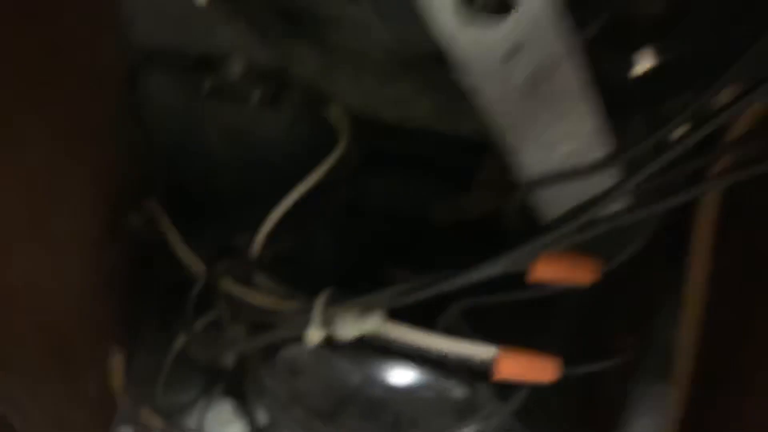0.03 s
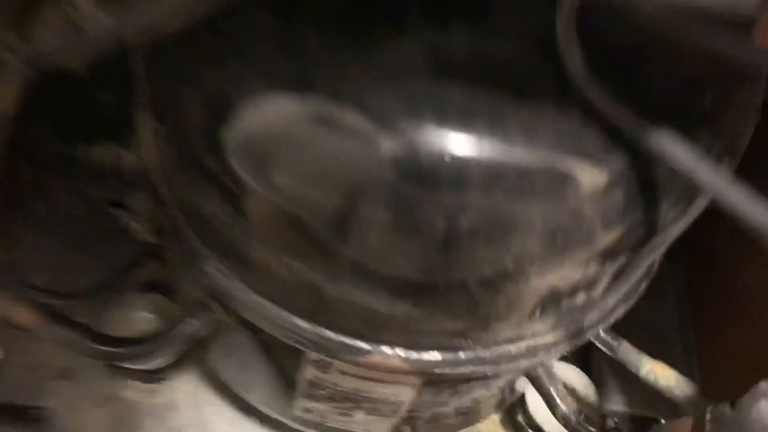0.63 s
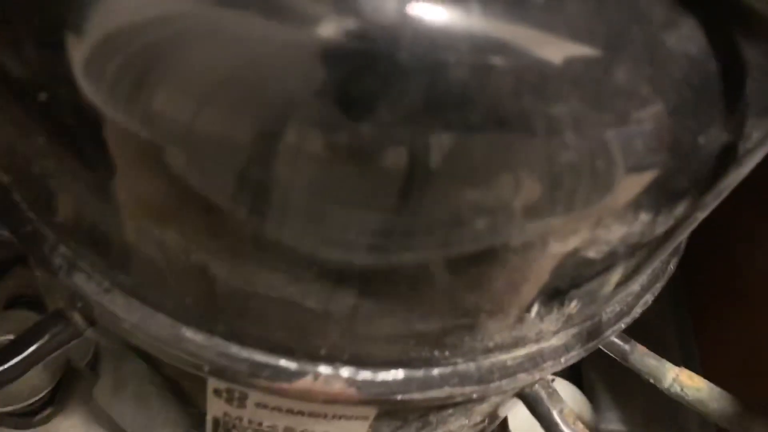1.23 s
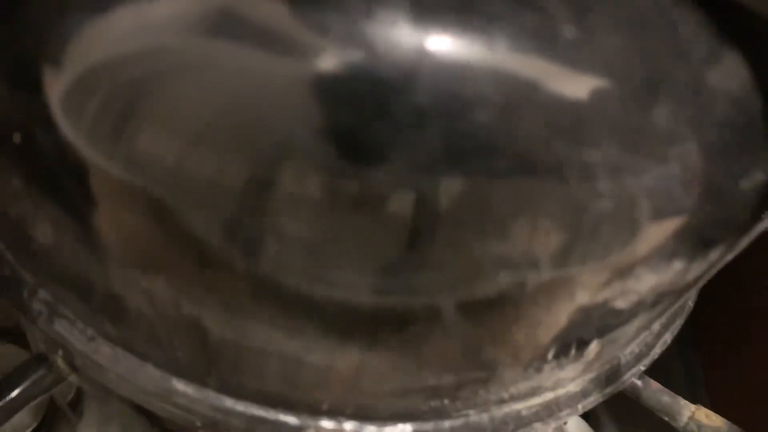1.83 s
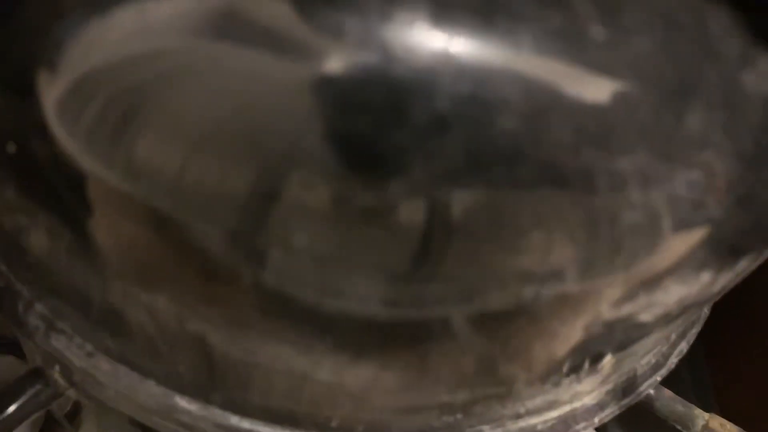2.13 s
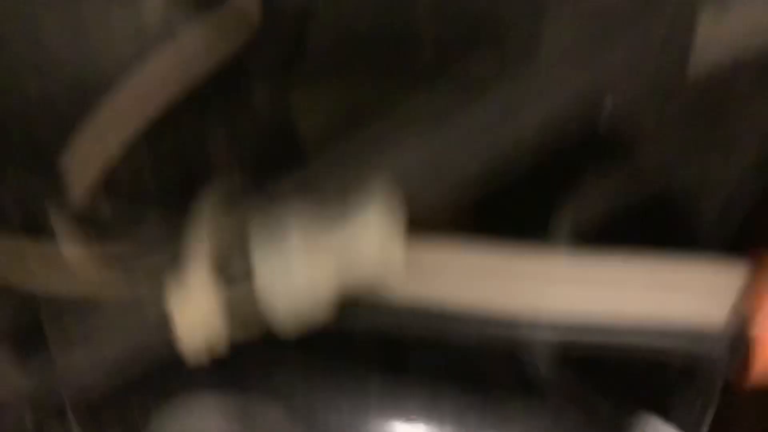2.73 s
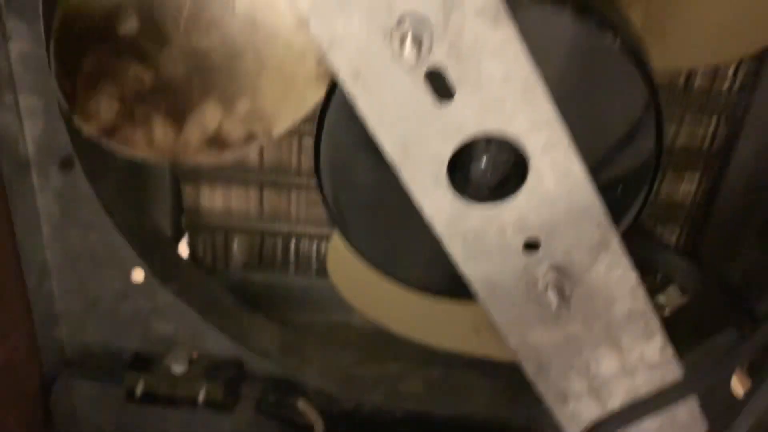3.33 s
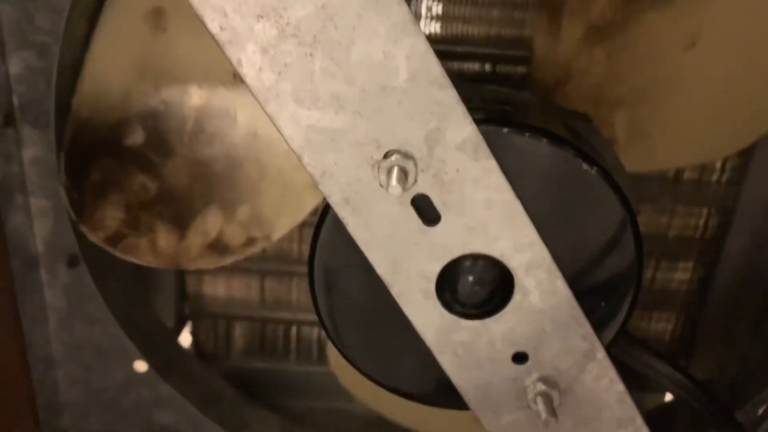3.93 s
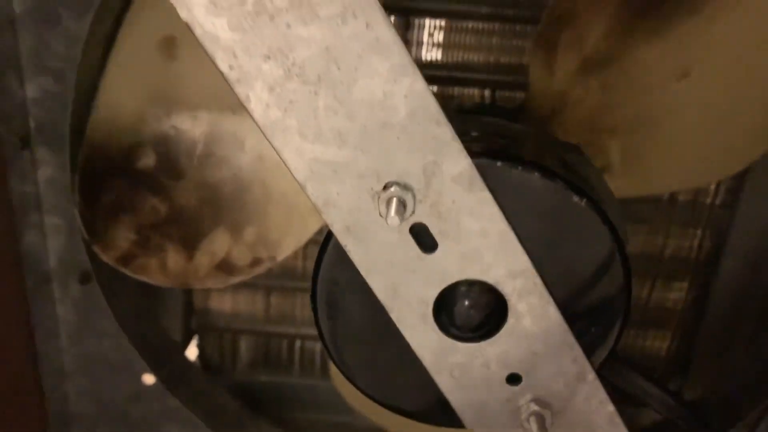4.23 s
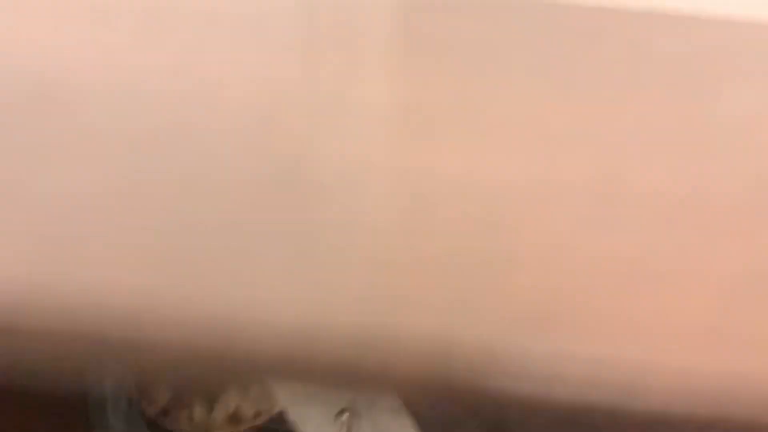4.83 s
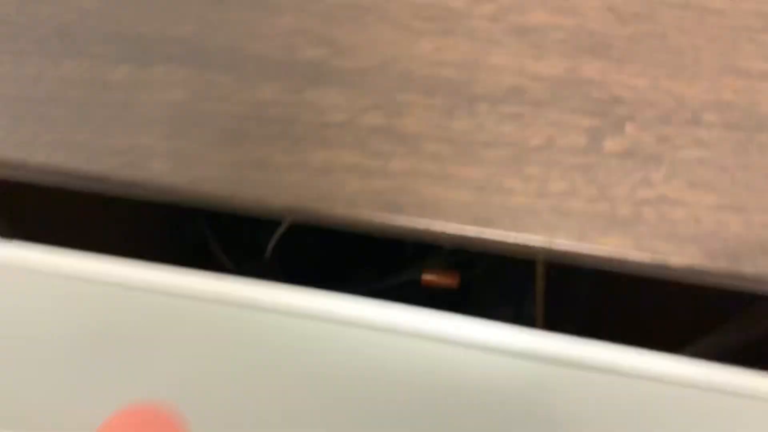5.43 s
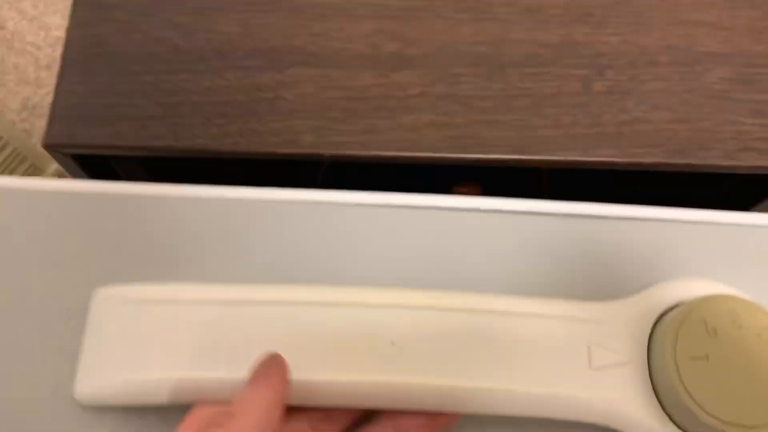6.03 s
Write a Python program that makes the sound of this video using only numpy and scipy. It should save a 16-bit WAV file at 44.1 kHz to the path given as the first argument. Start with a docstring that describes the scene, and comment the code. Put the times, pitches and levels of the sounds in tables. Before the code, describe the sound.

A refrigerator runs throughout, its fan giving a low drone and a steady rush of air with a fine hiss. In the first second the microphone moves close to the compressor, whose low hum carries a light metallic buzz, with a thin whine swelling around 2 seconds. The steel shell flares in brief, faint sizzles, mostly between 2 and 4 seconds. From about 3 seconds the microphone faces the fan and the air rush leads. The draught buffets the microphone with low rumbles and soft thumps near 1, 2.5 and 4.6 seconds. Around 5 seconds the microphone backs out into the small room and the machinery becomes quieter and duller. At about 5.7 seconds the plastic door handle snaps with a sharp click, followed by a quick hollow clack and dull knocks, the door ringing briefly over the hum until the end at 6 seconds.

```python
"""A refrigerator's condenser fan drones and pushes air through the coil; beside it a sealed compressor
hums and its piston rings the steel shell. The microphone moves in from the bay's rim to the compressor,
on to the fan, through its draught, then backs out of the cabinet. A hand pulls the plastic door handle,
which clicks and knocks in the small room.
Places: 0 beside the compressor, 1 facing the fan, 2 at the rim of the bay, 3 out in the room."""
import sys
import numpy as np
from scipy import signal
from scipy.fft import rfft, irfft, next_fast_len
from scipy.io import wavfile
from scipy.ndimage import uniform_filter1d, map_coordinates

SR = 44100
rng = np.random.default_rng(int(sys.argv[2]) if len(sys.argv) > 2 else 0)


def materialize(psi):
    """Save the field psi as 16-bit PCM at rate SR to the path in sys.argv[1].

    A 1-D psi becomes a single channel; in a 2-D psi each row is a channel.
    """
    bounded = np.clip(np.atleast_2d(psi).T, -1, 1)
    quanta = np.round(bounded * 32767).astype(np.int16)
    wavfile.write(sys.argv[1], SR, quanta)


N = 268304


def amp(db):
    """Decibels to gain."""
    return 10 ** (np.asarray(db) / 20)


def unit(x):
    """Scale to rms 1."""
    return x / np.sqrt(np.mean(x ** 2) + 1e-20)


def along(points, hz):
    """(Hz, value) points read on a log axis."""
    f, v = np.transpose(points)
    return np.interp(np.log(hz + 1), np.log(f + 1), v)


def curve(points):
    """(s, value) points read at every sample."""
    return np.interp(np.arange(N) / SR, *np.transpose(points))


def at_place(values, place):
    """Glide between values for places 0 to 3."""
    return np.interp(place, np.arange(len(values)), values)


def swells(rows):
    """Bell-shaped level changes in dB from (s, length s, dB) rows."""
    t = np.arange(N) / SR
    return sum(db * np.exp(-(2 * (t - s) / length) ** 2) for s, length, db in rows)


def wobble(knots_per_s):
    """Smooth random curve."""
    knots = rng.standard_normal(int(N * knots_per_s / SR) + 4)
    return map_coordinates(knots, [np.arange(N) * knots_per_s / SR])


def fading(start_s, t60_s, attack_s=0.00062):
    """Quick rise at start_s, then exponential decay."""
    age = np.maximum(np.arange(N) / SR - start_s, 0)
    return (1 - np.exp(-age / attack_s)) * amp(-60 * age / t60_s)


def filtered(x, response):
    """Apply a complex response of frequency."""
    m = next_fast_len(N + SR // 2)
    return irfft(rfft(x, m) * response(np.fft.rfftfreq(m, 1 / SR)), m)[..., :N]


def spread(pair):
    """Mix two unrelated signals to left and right: alike in the low mids, wide in the upper mids,
    fully alike in the top treble."""
    # (frequency [Hz], left-right correlation [ratio])
    likeness = [(40, 0.047), (150, 0.33), (350, 0.92), (750, 0.54), (1150, 0.3), (1500, 0.18), (2000, 0),
                (6500, 0), (7800, 0.79), (9000, 1), (15000, 1)]
    turn = lambda hz: np.arccos(np.clip(along(likeness, hz), -1, 1)) / 2
    mid, side = filtered(pair, lambda hz: np.array([np.cos(turn(hz)), np.sin(turn(hz))]))
    return np.array([mid + side, mid - side])


def noise(spectrum, patchy_db=0.0, modes=()):
    """Stereo noise of rms 1, lifted at its resonances, with drifting patches of gain."""
    z = signal.stft(rng.standard_normal((2, N)), nperseg=1024)[2]
    patches = uniform_filter1d(rng.standard_normal(z.shape[1:]), size=4, axis=0)
    patches = unit(uniform_filter1d(patches, size=6, axis=1))
    pair = signal.istft(z * amp(patchy_db * patches), nperseg=1024)[1][:, :N]
    boost_db = lambda hz: sum(db / (1 + (2 * (hz - centre) / width) ** 2) for centre, width, db in modes)
    return unit(spread(filtered(pair, lambda hz: amp(along(spectrum, hz) + boost_db(hz)))))


def fan_tones(blade_rad, place, jitter_rad=0.054, apart_rad=0.43):
    """Each passing blade pushes the air; uneven inflow shakes the size and timing of the pushes."""
    # (blade-rate order, level at places 0 to 3 [dB])
    harmonics = [(1, -33.5, -30, -25.5, -40.5), (2, -28, -30, -40.5, -41), (3, -35, -40.5, -33, -62),
                 (4, -34.5, -36.5, -37.5, -49.5), (5, -52, -44.5, -43, -49.5), (6, -43, -45.5, -47, -63),
                 (7, -60, -49, -53.5, -50), (8, -58, -56, -53, -74)]
    # one tone swells or sinks: (time [s], length [s], order, change [dB])
    tone_swells = [(0.136, 0.075, 1, 6), (0.217, 0.2, 2, 7), (.58, 0.068, 4, 6), (0.71, 0.29, 3, -21),
                   (0.73, 0.099, 4, -5), (1.145, 0.23, 2, -11), (1.72, .16, 1, -14), (2.715, 0.083, 4, 7.5),
                   (3.0, 0.34, 1, -11), (3.8, .12, 1, -16), (3.84, 0.25, 3, 12.5), (3.842, 0.12, 2, -8),
                   (3.99, 0.19, 1, 5.5), (4.55, 0.26, 5, 8.5), (4.597, 0.21, 4, 5), (4.62, 0.34, 1, 3),
                   (4.864, .14, 1, 5), (5.02, 0.064, 1, 4), (5.245, 0.2, 1, 4.5), (5.48, 0.14, 1, -14),
                   (5.3, 0.47, 5, -24)]
    # (flutter depth at places 0 to 3 [dB])
    flutter_db = [2.2, 2.2, 1.2, 1.2]
    out = np.zeros((2, N))
    for order, *levels_db in harmonics:
        db = at_place(levels_db, place) + at_place(flutter_db, place) * wobble(16)
        db += swells([(s, length, change) for s, length, k, change in tone_swells if k == order])
        phase = order * (blade_rad + jitter_rad * wobble(14)) + rng.uniform(0, 2 * np.pi)
        port_rad = apart_rad * np.array([wobble(3.03), wobble(2.974)])
        out += np.sqrt(2) * amp(db) * np.sin(phase + port_rad)
    return out


def air_rush(blade_rad, place, doublings, db_per_doubling=-6.5, chop=0.029, slide=0.08):
    """Fan turbulence, chopped at the blade rate and coloured by each place's standing waves."""
    # air behind the fan, in front, in the room: (frequency [Hz], relative density [dB])
    behind_spectrum = [(60, -4), (150, 2.5), (260, 0.5), (360, -4.5), (450, -18), (520, -7), (640, -7),
                       (1050, -18.5), (1400, -16.5), (2200, -20.5), (4000, -25.5), (5500, -32),
                       (8000, -37.5), (16000, -51)]
    front_spectrum = [(60, -9.5), (150, 1.5), (260, -4.5), (400, -8), (620, -8), (750, -11.5),
                      (1200, -14.5), (2200, -19.5), (3000, -23), (4100, -25.5), (5500, -32), (8000, -36.5),
                      (16000, -71)]
    room_spectrum = [(50, -11), (105, 2), (160, 0), (262, 3), (350, -1.5), (450, -0.5), (900, -5.5),
                     (1600, -10), (3000, -18.5), (5500, -25.5), (16000, -50)]
    # standing waves: (frequency [Hz], width [Hz], boost [dB])
    bay_modes = [(900, 90, 3), (1213, 110, 6.5), (1580, 140, 4), (2035, 100, 5), (2540, 270, 1.5),
                 (3300, 84, 2.5)]
    fan_modes = [(1335, 31, 7.4), (1520, 150, 3.2), (1910, 120, 2.8)]
    room_modes = [(1300, 80, 2.3), (1620, 56, 1.4)]
    behind = noise(behind_spectrum, patchy_db=1.2, modes=bay_modes)
    pitch_ratio = 1 + slide * np.minimum(place, 1)  # the bay's noise rises towards the fan
    behind = np.array([map_coordinates(x, [np.cumsum(pitch_ratio)], mode="mirror") for x in behind])
    front = noise(front_spectrum, patchy_db=2.04, modes=fan_modes)
    outside = noise(room_spectrum, patchy_db=2.6, modes=room_modes)
    # (noise, level at zero doublings [dB], power share at places 0 to 3)
    fields = [(behind, -28, [1, 0, 0, 0]), (front, -30.5, [0, 1, .5, 0]), (outside, -30.5, [0, 0, .5, 1])]
    rush = sum(np.sqrt(at_place(shares, place)) * amp(db) * air for air, db, shares in fields)
    return rush * amp(db_per_doubling * doublings) * (1 + chop * np.sin(blade_rad))


def coil_hiss(place, treble_loss_db):
    """Air hisses through the coil; its fins whistle, best heard facing the fan."""
    # (frequency [Hz], relative density [dB])
    spectrum = [(2000, -19), (5000, -9.5), (7300, -6), (7900, 2), (8800, -2.5), (9900, 1.5), (11400, -4),
                (12300, -5.5), (13200, -5.5), (14100, -6), (15700, -12)]
    # fin whistles: (frequency [Hz], width [Hz], boost [dB])
    fin_modes = [(10370, 110, 10.5), (11020, 190, 7.5)]
    facing = at_place([0, 1, 0, 0], place) ** 2
    plain = np.sqrt(1 - facing) * noise(spectrum, patchy_db=3)
    whistling = np.sqrt(facing) * noise(spectrum, patchy_db=3, modes=fin_modes)
    return amp(at_place([-45, -44.5, -47, -41.5], place) - treble_loss_db) * (plain + whistling)


def motor_hum(turns, place, waver_db=2.2):
    """The compressor motor hums on its shaft orders."""
    # (shaft order, level at places 0 to 3 [dB])
    harmonics = [(1, -55, -53, -49, -42), (2, -35, -48, -48, -40), (4, -41.5, -45.5, -36, -53),
                 (5, -50, -54, -48, -52)]
    hum = np.zeros(N)
    for order, *levels_db in harmonics:
        phase = 2 * np.pi * (order * turns + rng.random())
        hum += np.sqrt(2) * amp(at_place(levels_db, place)) * np.sin(phase)
    return hum * amp(waver_db * wobble(4.12))


def piston_strokes(turns, shaft_hz, gas_gain=0.58, stroke_db=1.0):
    """Each stroke puffs gas through the valve, whose repeating rattle gives lines at the shaft rate."""
    one_turn = unit(irfft(np.exp(2j * np.pi * rng.random((2, round(SR / shaft_hz / 2))))))
    rattle = np.array([map_coordinates(r, [turns % 1 * len(r)], mode="grid-wrap") for r in one_turn])
    gas = gas_gain * rng.standard_normal((2, N))
    return spread((rattle + gas) * amp(stroke_db * np.cos(2 * np.pi * turns)))


def compressor_shell(strokes, place, treble_loss_db, rasp_db=1.6, rasp_per_s=45):
    """Piston strokes ring the steel shell in five groups of modes; some flare and sputter."""
    # shell modes: (frequency [Hz], width [Hz], relative level [dB])
    low_modes = [(655, 380, 1), (910, 130, -7), (1194, 75, -2.5), (1540, 100, -6), (1990, 160, -13),
                 (2590, 170, -15)]
    whine_modes = [(1599, 60, 0)]
    main_modes = [(4053, 75, 0)]
    high_modes = [(4980, 70, -4), (7860, 230, 0)]
    sizzle_modes = [(4930, 65, 0), (6750, 100, 3), (7950, 95, -5.5), (10860, 300, 0.5), (12080, 390, 0.5)]
    # (level between flares at places 0 to 3 [dB])
    low_base_db = [-46.5, -69, -70, -75]
    main_base_db = [-60, -60, -59, -76]
    # (time [s], length [s], low change [dB], main change [dB], high change [dB])
    flares = [(.42, .1, -2, 4, 0), (.61, .1, -4, 9, 2), (.91, 0.26, 7, 10.5, -6), (1.28, .12, 3, 6, -2),
              (1.88, .14, -3, 2, 13), (2.35, 0.33, 6, 3, 11), (2.69, .09, 5, 6, 15),
              (2.782, 0.13, 0, 14.5, 11), (2.962, 0.11, -6, 11, 11), (3.15, .07, 0, 0, 14),
              (3.262, 0.12, -3, -4, 14), (3.567, .16, -2, 11, 9), (3.85, .1, -6, 7, 17),
              (4.3, 0.28, -2, 5, 5), (4.782, .12, 0, -2, 11)]
    # (time [s], level [dB])
    whine_db = [(0, -68), (1.2, -57), (1.7, -54), (2.1, -44), (2.5, -49), (2.8, -58), (6.08, -75)]
    low_db, main_db, high_db = (swells(np.array(flares)[:, [0, 1, column]]) for column in (2, 3, 4))
    low_db += at_place(low_base_db, place)
    main_db += at_place(main_base_db, place) + rasp_db * wobble(rasp_per_s)
    high_db += -63.5 - treble_loss_db + rasp_db * wobble(rasp_per_s)
    groups = [(low_modes, low_db), (whine_modes, curve(whine_db)), (main_modes, main_db),
              (high_modes, high_db), (sizzle_modes, -57 - treble_loss_db)]
    bandpass = lambda hz, centre, width: 1j * hz * width / (centre ** 2 - hz ** 2 + 1j * hz * width)
    steel = lambda hz, modes: sum(amp(db) * bandpass(hz, centre, width) ** 2 for centre, width, db in modes)
    return sum(amp(db) * unit(filtered(strokes, lambda hz: steel(hz, modes))) for modes, db in groups)


def draught(place, lumps_db=3.5):
    """Gusts buffet the microphone; an eddy is a thump or a few low throbs, unequal at the two ports."""
    # (frequency [Hz], relative density [dB])
    spectrum = [(10, -34), (22, -16), (35, 0), (75, -1), (140, -9), (280, -16.5), (600, -40.5), (2000, -61)]
    # (level at places 0 to 3 [dB])
    steady_db = [-30.5, -29.5, -32.5, -41]
    # (time [s], length [s], change [dB])
    gusts = [(.56, 0.27, 4.5), (1.1, 0.62, 7), (2.42, 0.51, 4.5), (3.8, 0.19, -1), (4.57, 0.31, 6),
             (4.85, 0.2, 8)]
    # (time [s], half length [s], throb [Hz], envelope peak [dB])
    eddies = [(0.999, .005, 100, -17), (1.2, .05, 70, -19), (2.236, .005, 100, -17), (2.26, .04, 68, -25),
              (2.48, .04, 76, -23), (2.77, .04, 70, -21), (3.417, .005, 100, -18), (4.593, .04, 78, -17)]
    rumble = unit(noise(spectrum) * amp(lumps_db * wobble(24)))
    out = amp(at_place(steady_db, place) + swells(gusts)) * rumble
    for s, half_s, hz, db in eddies:
        age = np.arange(N) / SR - s
        envelope = amp(db + rng.normal(0, 1, (2, 1))) * np.exp(-(age / half_s) ** 2)
        out += envelope * np.sin(2 * np.pi * (hz * age + rng.random()))
    return out


def door(crack_t60_s=0.094, clack_t60_s=0.07, knock_t60_s=0.12, blur_rad=0.6, apart_rad=0.17):
    """The handle takes up its slack and snaps free; the door panel knocks and rings."""
    # (time [s], bright crack [dB], hollow clack [dB], dull knock [dB], panel ring [dB])
    contacts = [(5.731, -53, -34, -30.5, -54), (5.7447, -25, -50, -28, -45), (5.765, -48, -32, -32, -38),
                (5.775, -58, -48, -54, -29), (5.808, -64, -58, -33, -50), (5.879, -64, -64, -34, -48)]
    # (frequency [Hz], relative density [dB])
    crack_spectrum = [(300, -10), (2000, -10), (4000, -5.5), (6500, -10), (9000, -1), (12000, -3),
                      (15700, -6)]
    clack_spectrum = [(200, -16), (700, -6), (1500, -6), (2200, 4.5), (3300, -4), (4500, -12), (16000, -35)]
    knock_spectrum = [(80, -22), (170, -3), (255, 9.5), (300, -3), (350, 2), (520, -3), (700, -2),
                      (1050, -5), (1700, -10), (4000, -25), (16000, -48)]
    # door and handle: (frequency [Hz], relative level [dB], t60 [s])
    modes = [(296, -1.5, 0.48), (396, -10, 0.28), (432, -6, 0.78), (484, -14, 0.69), (740, -19, 0.22),
             (854, -11.5, 0.25), (1026, -1, 0.19), (1087, -3.5, .13), (1270, -13, 0.24), (1420, -12, 0.13),
             (2220, -14, .2), (2670, -18, 0.082)]
    t = np.arange(N) / SR
    out = np.zeros((2, N))
    crack = noise(crack_spectrum, patchy_db=3.0)
    clack = noise(clack_spectrum)
    knock = noise(knock_spectrum, patchy_db=-0.5)
    for s, crack_db, clack_db, knock_db, _ in contacts:
        out += amp(crack_db) * fading(s, crack_t60_s) * crack
        out += amp(clack_db) * fading(s, clack_t60_s) * clack
        out += amp(knock_db) * fading(s, knock_t60_s) * knock
    for hz, db, t60_s in modes:
        # contacts add energy; the loose panel blurs the pitch
        energy = sum((amp(ring_db) * fading(s, t60_s)) ** 2 for s, *_, ring_db in contacts)
        phase = 2 * np.pi * hz * t + blur_rad * wobble(70) + apart_rad * rng.standard_normal((2, 1))
        out += amp(db) * np.sqrt(energy) * np.sin(phase)
    return out


def room(x):
    """Wall reflections as a noise tail; the top treble dies first."""
    # (frequency [Hz], t60 [s])
    decay = [(200, 0.42), (1200, 0.54), (4000, 0.65), (14000, 0.13)]
    hz, t, z = signal.stft(rng.standard_normal((2, SR // 2)), SR, nperseg=256)
    tail = signal.istft(z * amp(-60 * t / along(decay, hz)[:, None]), SR, nperseg=256)[1]
    return signal.fftconvolve(x, tail / np.linalg.norm(tail[0]), axes=1)[:, :N]


def scene(shaft_hz=59.22, near_m=0.3):
    """Fan, compressor, draught and door along the microphone's path."""
    # (time [s], blade-pass rate [Hz])
    blade_hz = [(0, 60.9), (.8, 60.9), (1.1, 61.3), (2.8, 61.7), (4.8, 61.5), (6.08, 61)]
    # microphone: (time [s], place [0 to 3])
    path = [(0, 2.5), (.22, 0.75), (.7, 0.19), (2.6, 0), (3.2, 0.83), (3.85, 1.03), (4.55, 0.9), (5.0, 2),
            (5.1, 2.5), (5.45, 3), (6.08, 3)]
    # (time [s], distance from the coil [m])
    distance_m = [(0, 0.36), (.3, 0.31), (1.0, 0.32), (1.5, 0.29), (2.5, 0.3), (4.3, 0.29), (4.75, 0.3),
                  (5.12, 0.52), (5.5, 0.78), (6.08, 0.87)]
    place = curve(path)
    doublings = np.log2(curve(distance_m) / near_m)
    treble_loss_db = 10.5 * doublings
    blade_rad = 2 * np.pi * np.cumsum(curve(blade_hz)) / SR
    fan = fan_tones(blade_rad, place) + air_rush(blade_rad, place, doublings)
    hiss = coil_hiss(place, treble_loss_db)
    turns = shaft_hz * np.arange(N) / SR + 0.0038 * wobble(4)
    hum = motor_hum(turns, place)
    shell = compressor_shell(piston_strokes(turns, shaft_hz), place, treble_loss_db)
    click = door()
    return fan + hiss + hum + shell + draught(place) + click + amp(-8.0) * room(click)


def record(dry, lag_s=0.000256, lag_from_hz=6000, top_hz=15750):
    """Band-limited stereo; the left channel is fuller in the bass and late in the top treble."""
    # (frequency [Hz], left minus right [dB])
    balance = [(50, 0.3), (150, 2), (650, 1.6), (1400, 0), (5000, -0.9), (9000, -0.5)]
    sides = np.array([[.5], [-.5]])
    lag = lambda hz: np.exp(-2j * np.pi * hz * lag_s * sides * (hz > lag_from_hz))
    return filtered(dry, lambda hz: amp(sides * along(balance, hz)) * lag(hz) * (hz < top_hz))


dry = scene()
out = record(dry)
materialize(out)
```